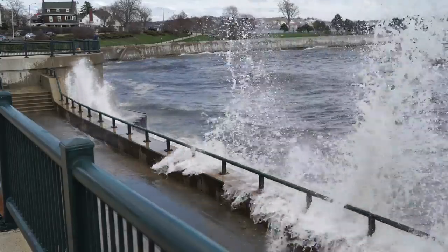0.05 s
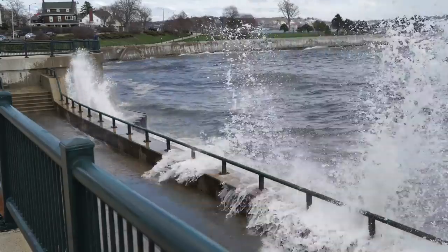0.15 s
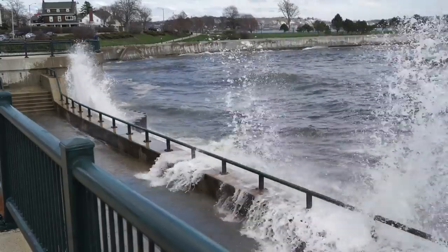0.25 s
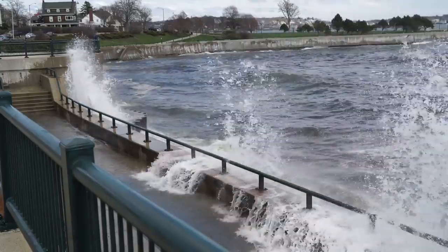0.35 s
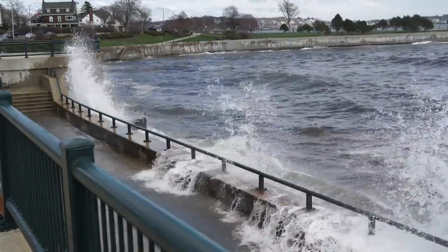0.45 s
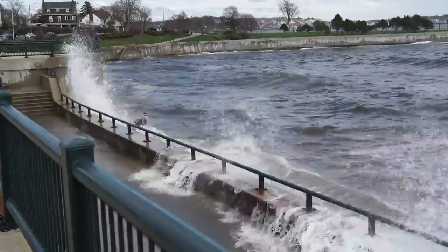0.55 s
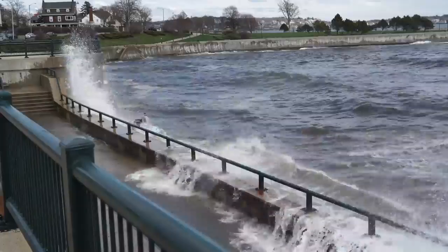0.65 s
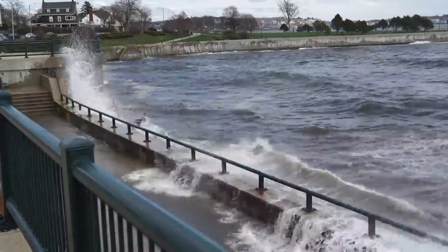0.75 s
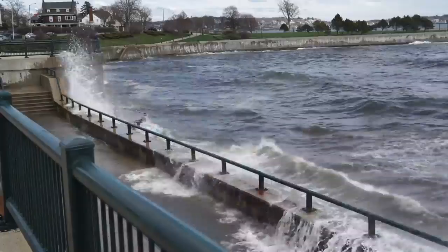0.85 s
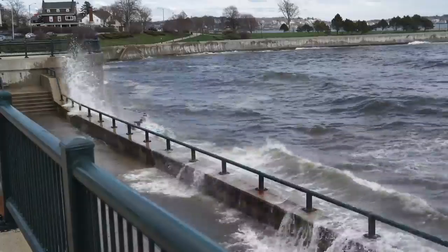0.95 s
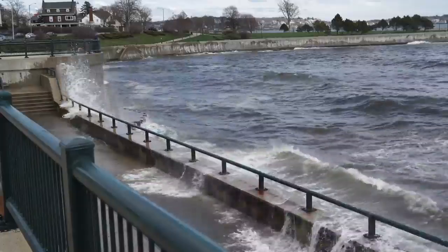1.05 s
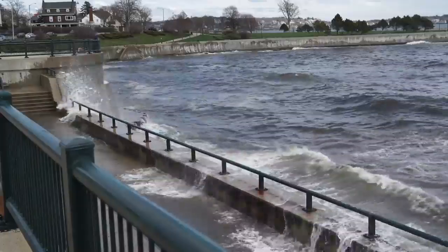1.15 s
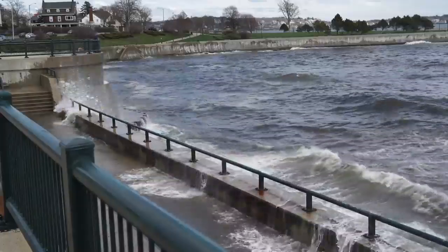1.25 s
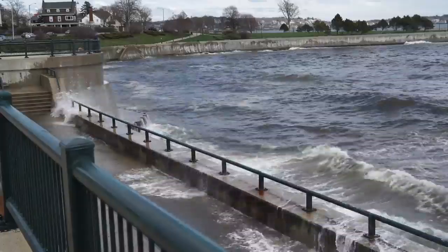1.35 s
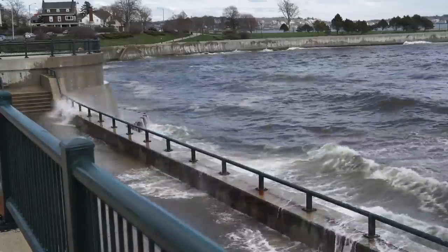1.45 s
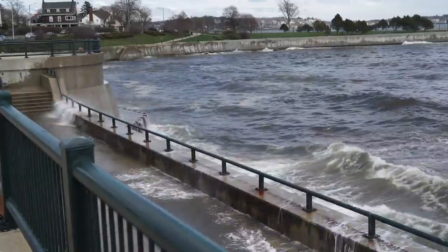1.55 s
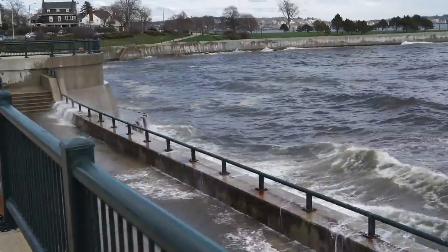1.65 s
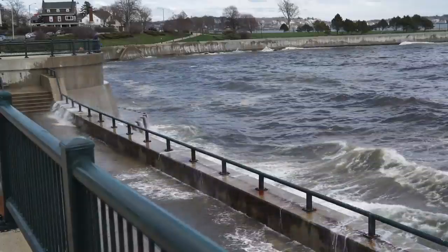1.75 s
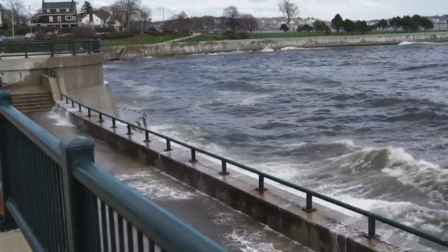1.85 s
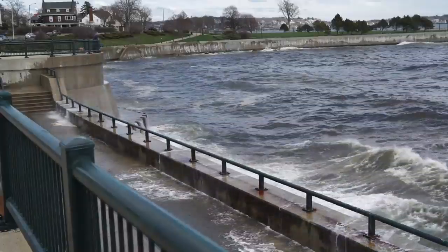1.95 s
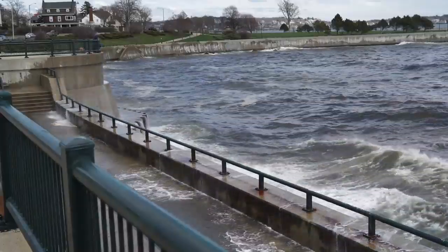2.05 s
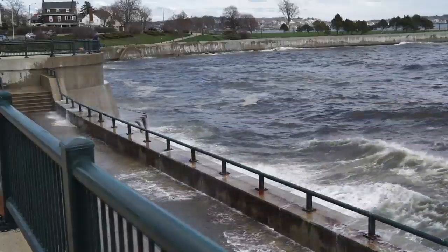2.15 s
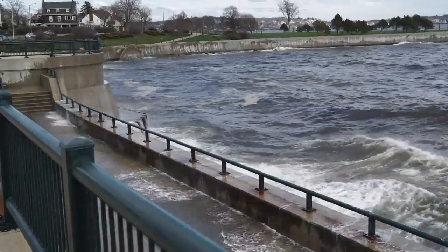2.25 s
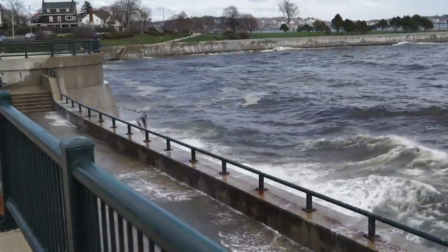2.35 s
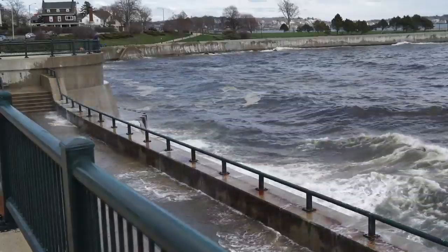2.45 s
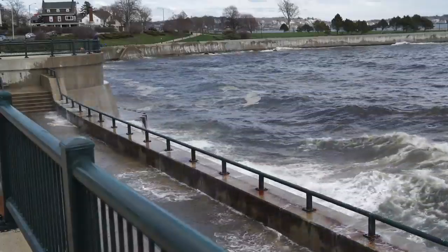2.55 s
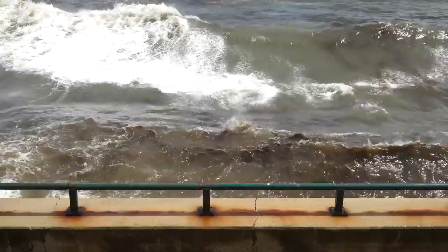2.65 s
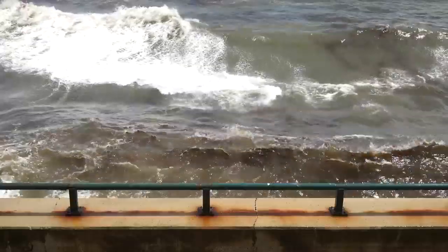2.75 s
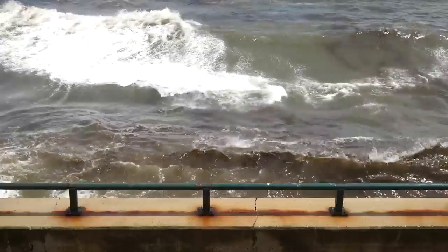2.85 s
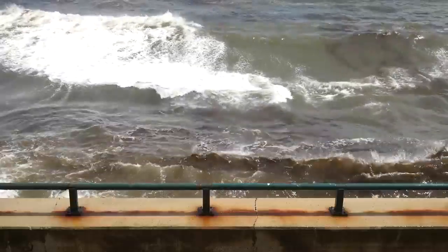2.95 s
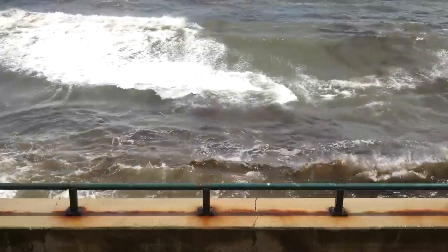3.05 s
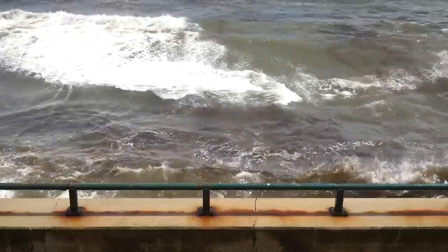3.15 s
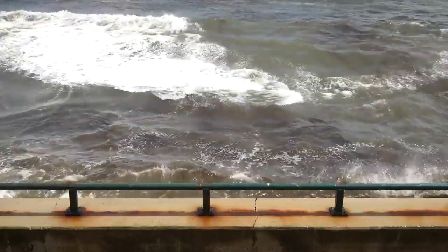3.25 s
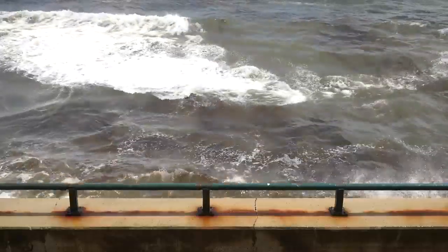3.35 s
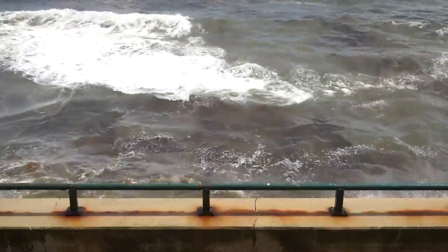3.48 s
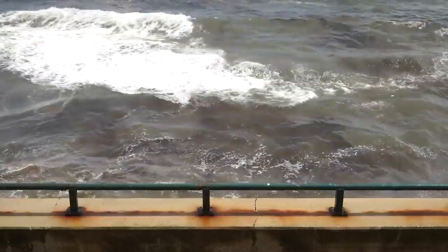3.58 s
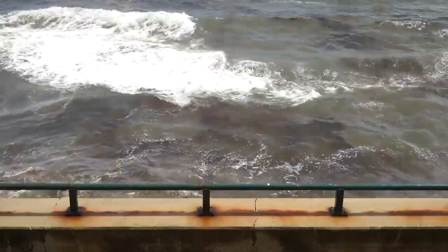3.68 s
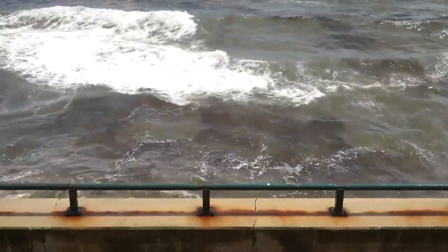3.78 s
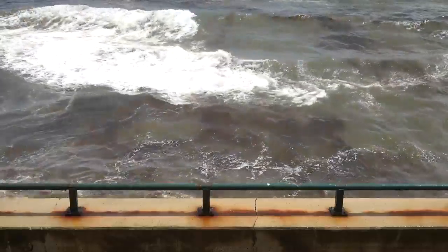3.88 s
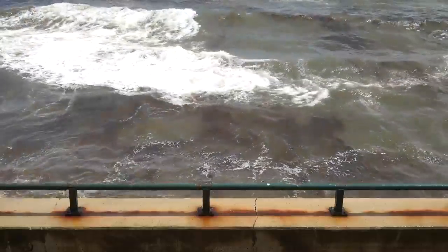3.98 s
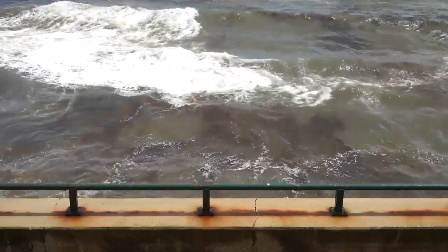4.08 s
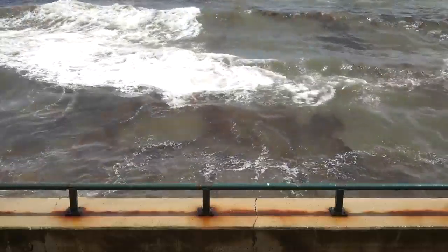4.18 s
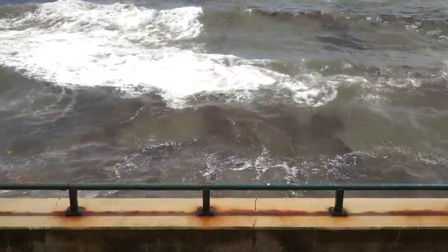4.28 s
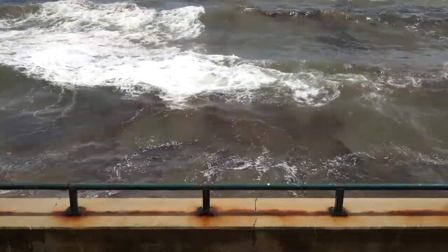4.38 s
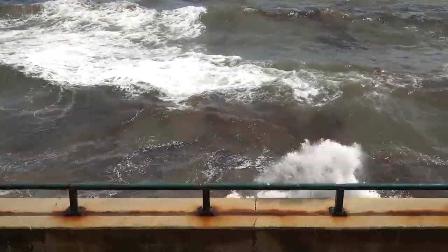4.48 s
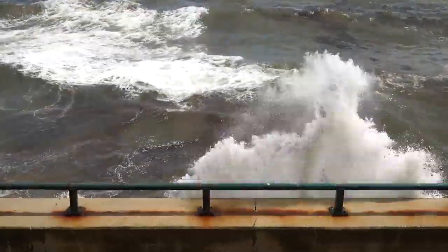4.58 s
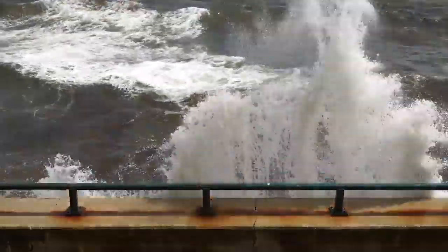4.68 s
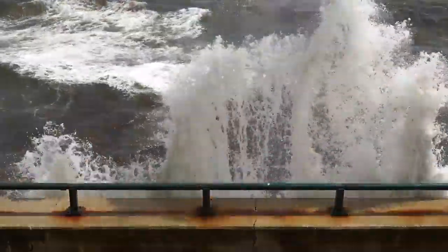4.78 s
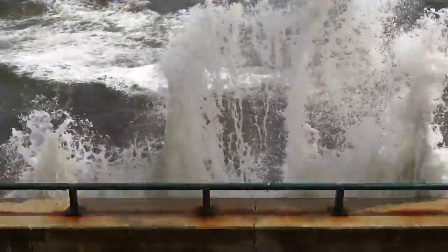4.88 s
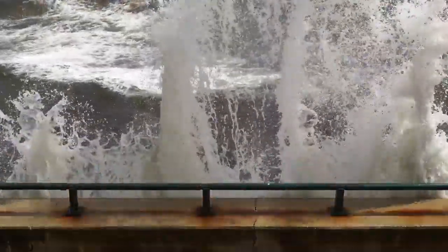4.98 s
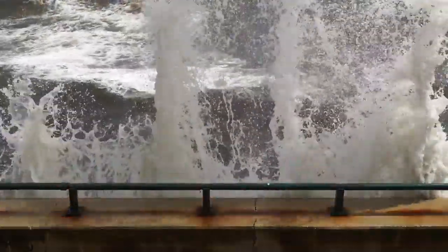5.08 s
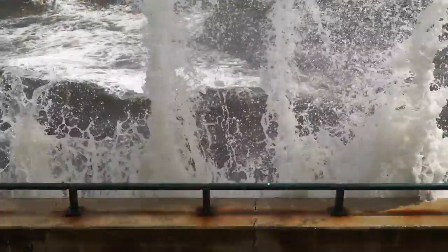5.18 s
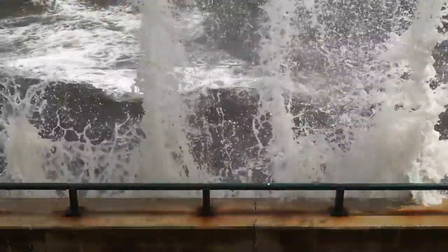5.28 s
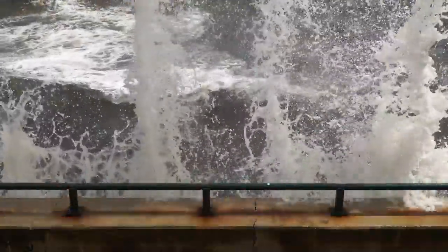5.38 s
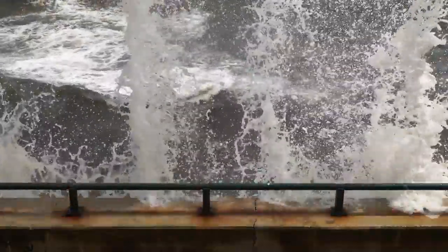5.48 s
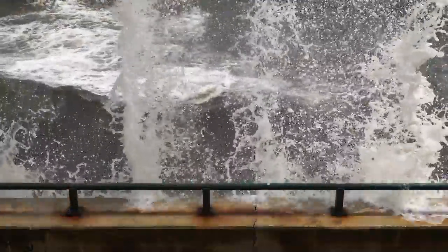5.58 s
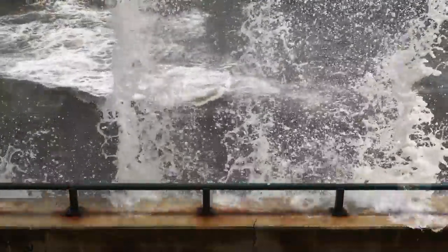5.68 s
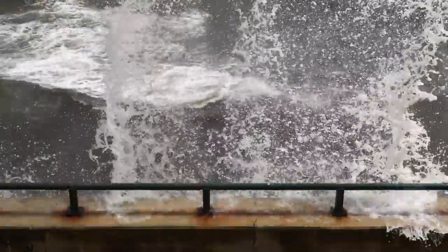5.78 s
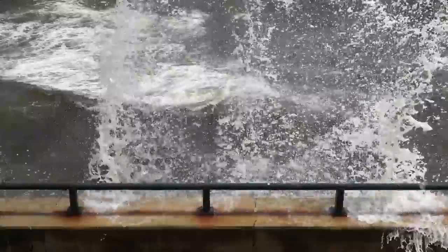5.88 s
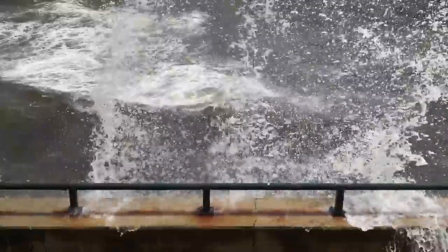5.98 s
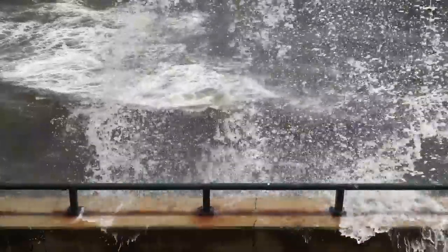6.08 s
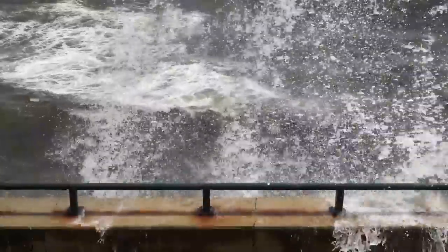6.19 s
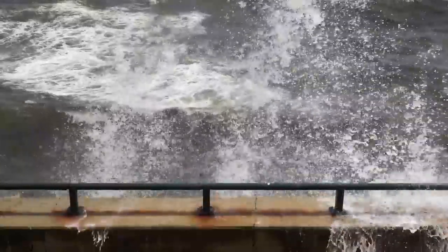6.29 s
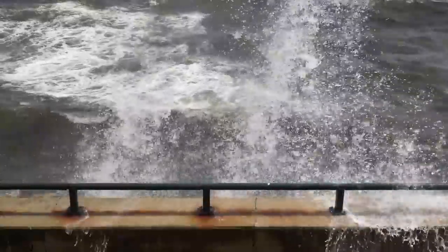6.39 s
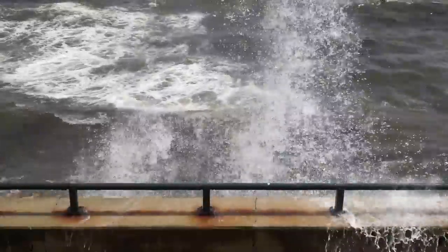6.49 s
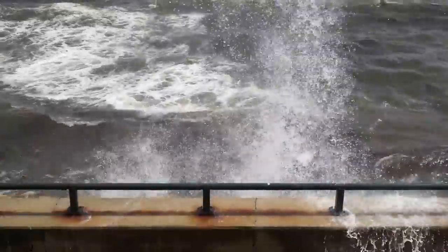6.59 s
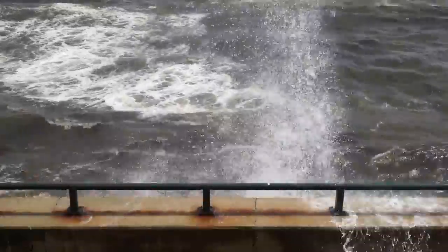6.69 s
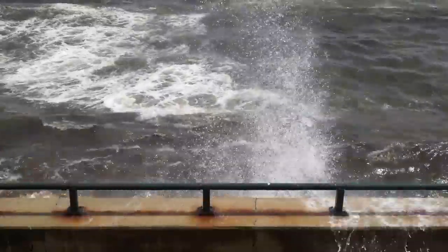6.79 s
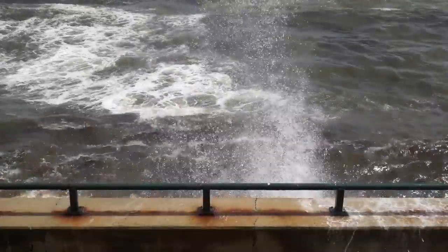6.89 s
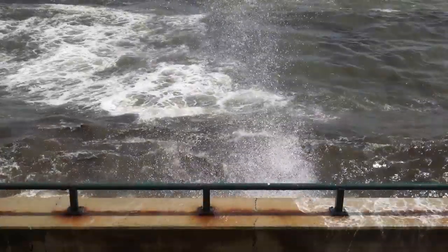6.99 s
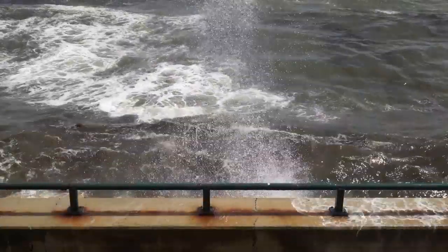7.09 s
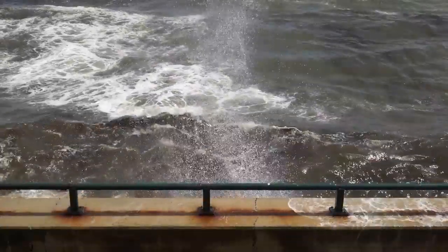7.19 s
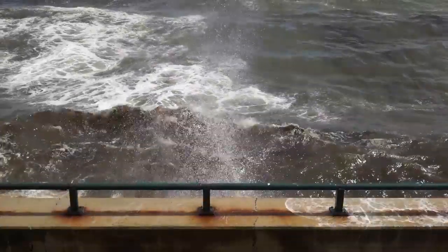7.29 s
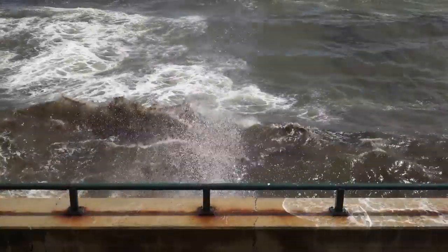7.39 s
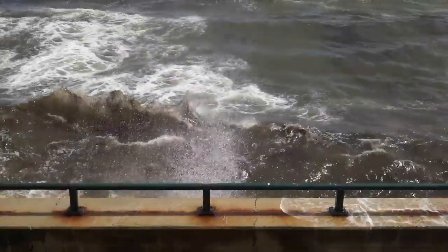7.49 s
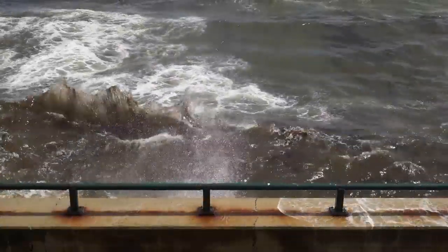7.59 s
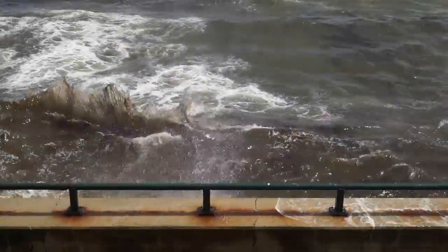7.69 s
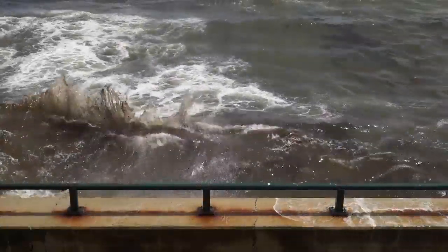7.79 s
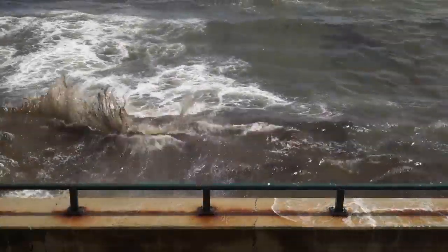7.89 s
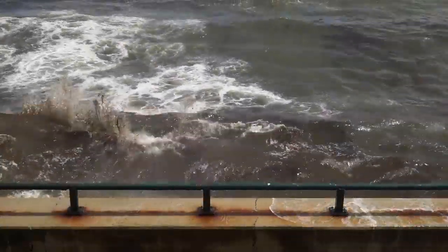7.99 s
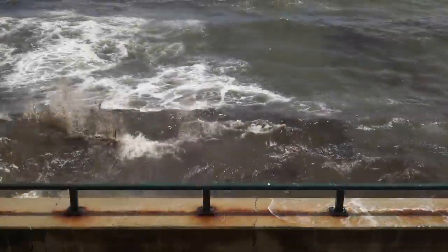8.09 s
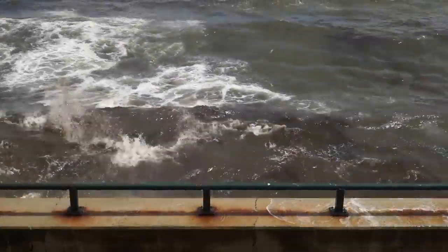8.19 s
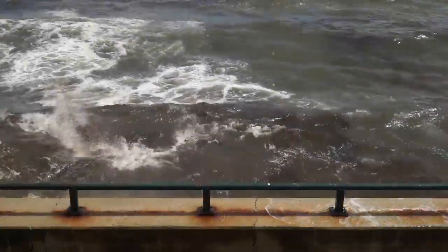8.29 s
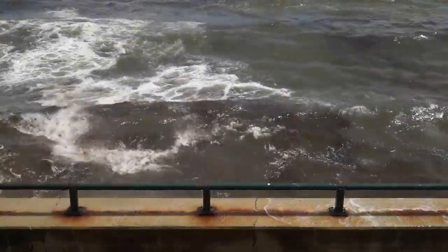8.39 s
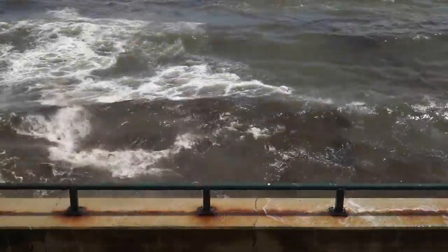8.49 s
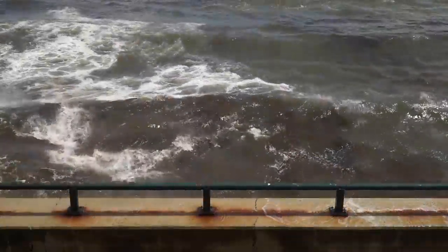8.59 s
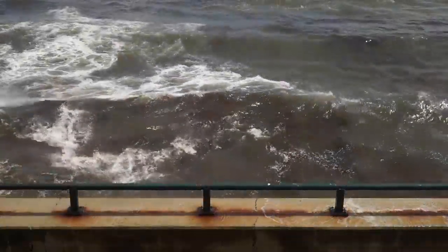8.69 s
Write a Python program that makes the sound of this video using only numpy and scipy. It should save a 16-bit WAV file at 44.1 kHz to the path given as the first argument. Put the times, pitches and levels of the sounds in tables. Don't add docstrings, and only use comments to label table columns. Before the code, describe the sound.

Outdoors by a concrete seawall, one small microphone. Loud surf roar and splashing spray fall back and thin over nearly three seconds. Then an abrupt change to a more exposed view: quieter, muffled churning water under heavy wind thumps, a dull slap, deep booms of a wave striking the wall around four and a half seconds, then fine spray and pattering drops, ending with renewed surges and gusts.

```python
import sys
import numpy as np
from scipy import signal
from scipy.fft import rfft, irfft, next_fast_len
from scipy.io import wavfile
from scipy.ndimage import uniform_filter1d, minimum_filter1d, map_coordinates

SR = 44100
rng = np.random.default_rng(int(sys.argv[2]) if len(sys.argv) > 2 else 0)


def rack_gain(trim_db):
    fader = np.asarray(trim_db, float)
    return 10 ** (fader / 20)


def master(y):
    cut = np.clip(np.atleast_2d(y).T, -1, 1)
    pcm = np.round(cut * 32767)
    wavfile.write(sys.argv[1], SR, pcm.astype(np.int16))


N = 385434
CUT_S = 2.734


def unit(x):
    return x / np.sqrt(np.mean(x ** 2) + 1e-20)


def per_shot(pair):
    after = np.clip((np.arange(N) / SR - CUT_S) / 0.004 + 0.5, 0, 1)
    return (1 - after) * np.asarray(pair[0]) + after * np.asarray(pair[1])


def curves(shots):
    t = np.arange(N) / SR
    interpolated = []
    for shot in shots:
        knots_s, *columns = np.transpose(shot)
        interpolated.append([np.interp(t, knots_s, column) for column in columns])
    return per_shot(interpolated)


def swells(rows, gain):
    centre_s, length_s, *heights = np.transpose(rows)
    foot_to_foot_s = 1.69 * length_s
    t = np.arange(0, N + 64, 64) / SR
    shape = np.cos(np.pi * np.clip((t[:, None] - centre_s) / foot_to_foot_s, -0.5, 0.5)) ** 2
    return [np.interp(np.arange(N) / SR, t, shape @ gain(h)) for h in heights]


def wobble(rate_hz):
    knots = rng.standard_normal(int(N * rate_hz / SR) + 4)
    return map_coordinates(knots, [np.arange(N) * rate_hz / SR])


def filtered(x, response):
    m = next_fast_len(len(x) + 8192)
    return irfft(rfft(x, m) * response(np.fft.rfftfreq(m, 1 / SR)), m)[:len(x)]


def coloured(x, spectrum):
    f, db = np.transpose(spectrum)
    return unit(filtered(x, lambda hz: rack_gain(np.interp(np.log(hz + 1), np.log(f), db, -120, -120))))


def evened(x, span_s, share):
    level = np.sqrt(np.abs(uniform_filter1d(x ** 2, int(span_s * SR))) + 0.02)
    return unit(x / level ** share)


def patchy(depth_db):
    z = signal.stft(rng.standard_normal(N + 512), nperseg=512)[2]
    field = uniform_filter1d(rng.standard_normal(z.shape), size=6, axis=0)
    field = uniform_filter1d(field, size=14, axis=1)
    return signal.istft(z * rack_gain(depth_db * unit(field)), nperseg=512)[1][:N]


def grains(count, centre_hz, cycles, spread_db, size):
    when, pitch, strength = rng.random((count, 3)).T
    hz = centre_hz * 2 ** (2 * pitch - 1)
    turns = hz[:, None] * np.arange(size) / SR
    shape = np.sin(2 * np.pi * turns * (1 + 0.025 * turns / cycles)) * np.exp(-turns / cycles)
    shape *= rack_gain(spread_db * strength ** 3)[:, None]
    where = (when * N).astype(int)[:, None] + np.arange(size)
    return unit(np.bincount(where.ravel(), shape.ravel(), N + size)[:N])


def water_state():
    # t/s, strength/dB, frothiness/dB
    churn_table = [
        [(0.0, -21, 0.5), (0.9, -21.5, -1), (1.4, -28, 0.5), (2.0, -31, 4), (2.734, -29.5, 4.5)],
        [(2.734, -37.5, -1), (3.58, -39.5, 1.5), (4.47, -30.5, 0.5), (4.85, -28, -1.5), (5.3, -40, -2),
         (5.46, -31, -1), (5.9, -33.5, 2.5), (6.3, -28, -3.5), (7.05, -35, 0.5), (7.4, -32.5, 0),
         (7.95, -35, 0.5), (8.45, -29.5, 0), (8.74, -28, 2)],
    ]
    # t/s, amount/dB, droplet fineness/dB
    fall_table = [
        [(0.0, -20.5, -0.5), (0.4, -16.5, -0.5), (0.95, -18.5, -1.5), (1.35, -27, 0.5), (2.0, -36, 1),
         (2.734, -38.5, 0)],
        [(2.734, -41, -4), (3.32, -40.5, -5.5), (3.55, -46, -3.5), (4.585, -43, -1.5), (4.63, -43, 0),
         (5.35, -43, 3), (5.47, -37, 0), (6.2, -32.5, 0.5), (6.66, -31.5, 6.5), (7.05, -39.5, 2),
         (8.0, -40, 1.5), (8.74, -30.5, 2)],
    ]
    # t/s, length/s, churn change/dB, fall change/dB, fineness change/dB
    change_table = [(0.13, 0.18, 1.5, 0.5, -0.5), (0.33, .2, -1, -0.5, 0), (0.62, .15, 0, -1, 1.5),
                    (0.76, .2, -1, -1, 4), (1.64, 0.11, 1.5, 1, 1), (3.05, 0.32, 4.5, 3.5, -4),
                    (4.77, 0.093, -2.5, 1.5, 1.5), (4.85, 0.052, -4, -2, 3), (4.93, 0.25, -2.5, 1.5, 0.5),
                    (5.62, 0.22, -1, 1.5, 1), (5.78, 0.18, -0.5, 3, 1.5), (5.98, 0.16, -0.5, 2, 0),
                    (6.44, 0.39, -2, 3.5, 0), (6.87, .15, 0.5, 0, -0.5), (8.2, .2, 1.5, 0, 1),
                    (8.52, .12, 3, 1, -1), (8.64, 0.17, 0, 0, 2.5), (7.75, 0.16, -0.5, -2, 0),
                    (2.4, 0.22, 0.5, -1, 0.5), (2.62, 0.12, 2.5, 1, 0), (5.13, .2, -2, -1.5, 0)]
    churn_db, froth_db = curves(churn_table)
    fall_db, fine_db = curves(fall_table)
    churn_change_db, fall_change_db, fine_change_db = swells(change_table, np.asarray)
    return churn_db + churn_change_db, fall_db + fall_change_db, fine_db + fine_change_db, froth_db


def sea(clumps):
    # f/Hz, level/dB per Hz
    crash_colour = [(80, -40), (170, 0), (270, -3), (380, -0.5), (520, -2.5), (900, -15.5), (2500, -41)]
    roar_colour = [(50, -40), (120, 7.5), (200, -0.5), (370, -1), (550, -3.5), (900, -16), (2500, -46)]
    wash_colour = [(250, -20), (500, -4.5), (800, 1.5), (1200, -1), (1800, -8.5), (3000, -14.5),
                   (8000, -86)]
    foam_colour = [(800, -61), (1600, -9), (2400, -2.5), (3500, -0.5), (5000, -4.5), (7500, -14.5),
                   (16000, -49)]
    roar_db, foam_db, _, froth_db = water_state()
    wash_db = 0.4 * roar_db + 0.51 * foam_db + froth_db + per_shot((-3.5, -4.5))
    surge = wobble(9)
    gurgle = grains(count=4000, centre_hz=439.2, cycles=2.3, spread_db=10.5, size=700)
    fizz = grains(count=16000, centre_hz=2574, cycles=1.42, spread_db=5.5, size=120)

    churn = patchy(depth_db=-0.7) + 0.16 * gurgle
    seen = per_shot((coloured(churn, crash_colour), coloured(churn, roar_colour)))
    roar = evened(seen, span_s=0.039, share=0.42)
    wash = coloured(patchy(depth_db=-0.7) + 0.13 * gurgle + 0.21 * fizz, wash_colour)
    foam = coloured(patchy(depth_db=0.5) + 0.34 * fizz, foam_colour)
    return (rack_gain(roar_db - 0.16) * roar
            + rack_gain(wash_db + 0.3 * surge + 0.28 * clumps) * wash
            + rack_gain(foam_db + 0.11 * surge + 0.56 * clumps - 3) * foam)


def shower(clumps):
    # f/Hz, level/dB per Hz
    spray_colour = [(2500, -52), (4500, -5.5), (6500, -3.5), (9000, -3.5), (10500, -10), (13000, -25),
                    (18000, -50)]
    mist_colour = [(7000, -42), (10000, -3), (11500, -1.5), (13500, -3), (15000, -5), (15800, -13)]
    _, fall_db, fine_db, _ = water_state()
    spray_db = fall_db + 0.6 * fine_db - 10
    mist_db = fall_db + fine_db - 16.5
    rain = grains(count=20000, centre_hz=9000, cycles=0.69, spread_db=8, size=30)
    spray = coloured(patchy(depth_db=1) + 0.59 * rain, spray_colour)
    mist = coloured(patchy(depth_db=1) + 0.24 * rain, mist_colour)
    return rack_gain(spray_db + 0.61 * clumps) * spray + rack_gain(mist_db + 0.62 * clumps) * mist


def gusts():
    # t/s, strength/dB
    wind_table = [
        [(0.0, -31), (0.8, -35), (1.8, -35), (2.734, -37.5)],
        [(2.734, -26.5), (3.5, -25.5), (4.3, -21), (5.3, -17), (5.8, -23.5), (7.0, -21.5), (7.55, -27),
         (8.1, -26), (8.74, -22)],
    ]
    # t/s, length/s, slow buffet/dB, fast flutter/dB
    gust_table = [(0.3, 0.18, -40, -33), (0.57, 0.23, -30, -23), (0.8, .25, -28, -23),
                  (1.05, 0.3, -30, -25), (1.24, 0.22, -32, -31), (2.07, 0.29, -30, -21),
                  (2.33, 0.1, -42, -25), (2.52, .2, -31, -25), (2.8, 0.13, -24, -32),
                  (2.95, 0.089, -18.5, -22.5), (3.12, 0.16, -11.5, -19.5), (3.33, 0.16, -14, -23),
                  (3.62, 0.29, -22, -40), (3.88, .22, -18, -22.5), (4.18, 0.22, -21.5, -20.5),
                  (4.46, 0.27, -21, -21), (4.87, 0.22, -7.5, -24), (5.07, 0.15, -18, -17),
                  (5.24, 0.2, -22, -15), (5.57, 0.33, -14.5, -15.5), (6.06, 0.38, -15, -15.5),
                  (6.4, 0.21, -19, -15), (6.7, 0.14, -10.5, -29), (7.0, 0.38, -13, -26),
                  (7.42, 0.13, -20, -23.5), (7.73, 0.13, -22.5, -25), (7.925, 0.12, -10, -15.5),
                  (8.25, 0.095, -15, -31), (8.43, 0.24, -18, -26), (8.74, 0.081, -9, -17)]
    buffet_db, = curves(wind_table)
    growth = per_shot((0.49, 1.31))
    flutter_db = growth * (buffet_db + 30) - 30 + per_shot((8, -5))
    return np.hypot(rack_gain(np.array([buffet_db, flutter_db])), swells(gust_table, rack_gain))


def wind():
    # f/Hz, level/dB per Hz
    buffet_colour = [(4, -10.5), (12, -1.5), (25, -2), (45, -9), (70, -18), (120, -62), (300, -93)]
    flutter_colour = [(20, -33), (45, 2.5), (60, 1), (90, -6), (130, -15), (180, -20), (400, -50)]
    boom_colour = [(20, -46), (45, -1), (65, 0), (130, -1), (200, -6), (300, -14), (600, -62)]
    slow_gain, fast_gain = gusts()
    buffet = evened(coloured(rng.standard_normal(N), buffet_colour), span_s=0.12, share=0.55)
    flutter = evened(coloured(rng.standard_normal(N), flutter_colour), span_s=0.085, share=0.45)
    boom = rack_gain(-2.5) * evened(coloured(rng.standard_normal(N), boom_colour), span_s=0.2, share=0.4)
    return slow_gain * buffet + fast_gain * per_shot((boom, flutter))


def drops():
    # t/s, tick level/dB, tip level/dB, plop level/dB
    drop_table = [(0.2404, -14, -32, -22), (0.7412, -13, -25, -21), (5.6974, -26, -37, -26),
                  (5.728, -34, -48, -19), (5.782, -32, -46, -24), (5.8628, -32, -28, -32),
                  (5.9618, -26, -43, -23), (5.9808, -21, -34, -20), (6.043, -24, -44, -28),
                  (6.111, -30, -46, -19), (6.129, -21, -44, -20), (6.1809, -26, -40, -29),
                  (6.1923, -22, -38, -29), (6.2854, -20, -42, -27), (6.368, -28, -42, -17),
                  (6.393, -26, -39, -26), (6.431, -24, -41, -17), (6.4357, -27, -39, -18),
                  (6.4931, -24, -42, -24), (6.497, -22, -42, -15.5), (6.5664, -20, -37, -24),
                  (6.7874, -26, -39, -35), (6.841, -36, -48, -23), (6.8665, -32, -46, -29)]
    # f/Hz, level/dB per Hz
    tick_colour = [(4000, -30), (5500, 2), (9000, -2), (11000, -20)]
    tip_colour = [(8000, -30), (10500, 0), (15000, 0), (18000, -10)]
    plop_colour = [(900, -32), (1600, 1), (4500, -3), (6000, -30)]
    out, t = np.zeros(N + SR), np.arange(SR // 30) / SR
    envelope = rack_gain(-60 * t / 0.0089) * (1 - np.exp(-t / 0.0002))
    for start_s, tick_db, tip_db, plop_db in drop_table:
        parts = (tick_db - 2.5, tick_colour), (tip_db + 5, tip_colour), (plop_db - 0.5, plop_colour)
        burst = sum(rack_gain(db) * coloured(rng.standard_normal(len(t)), colour) for db, colour in parts)
        out[round(start_s * SR):][:len(t)] += burst * envelope
    return out[:N]


def slaps():
    # t/s, peak level/dB, pitch f/Hz, t60/s
    slap_table = [
        (3.097, -12, 400, .06),
        (4.441, -14, 200, .14),
        (4.472, -19, 300, .1),
        (4.572, -22, 500, .08),
        (4.65, -22, 420, .09),
        (5.966, -24, 1250, .12),
        (8.374, -18, 340, .11),
        (8.5, -21, 420, .1),
    ]
    out, t = np.zeros(N + SR), np.arange(SR // 4) / SR
    onset = 1 - np.exp(-t / 0.0015)
    for start_s, db, hz, t60_s in slap_table:
        decay = rack_gain(-60 * t / t60_s)
        pocket = np.sin(2 * np.pi * hz * t) * decay
        spread = [(0.27 * hz, -25), (0.28 * hz, 0), (1.9 * hz, -4), (5.6 * hz, -24)]
        puff = evened(coloured(rng.standard_normal(len(t)), spread), span_s=0.01, share=0.15) * decay
        out[round(start_s * SR):][:len(t)] += rack_gain(db) * (0.8 * pocket + 0.6 * puff) * onset
    return out[:N]


def port_ring(water):
    # f/Hz, width/Hz, gain
    port = (3180, 604, 0.98)
    hz, width_hz, gain = port
    return filtered(water, lambda f: 1 + gain * 1j * f * width_hz / (hz * hz - f * f + 1j * f * width_hz))


def scene():
    clumps = wobble(22) + 0.65 * wobble(6.2)
    water = sea(clumps) + shower(clumps) + drops() + slaps()
    return np.tile(port_ring(water) + wind(), (2, 1))


def low_pass(x):
    return signal.sosfilt(signal.butter(12, 15670, fs=SR, output="sos"), x)


def record(dry):
    top, hold = 0.69, SR // 25
    need = np.minimum(1, top / (np.abs(dry[0]) + 1e-9))
    held = dry * uniform_filter1d(minimum_filter1d(need, hold), hold)
    return low_pass(held)


dry = scene()
out = record(dry)
master(out)
```